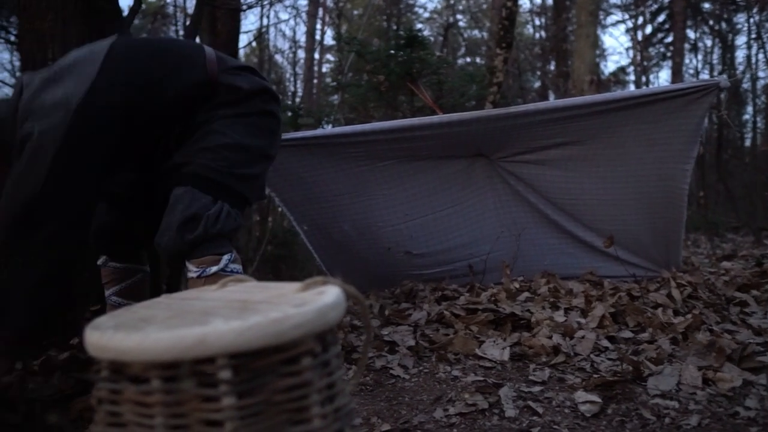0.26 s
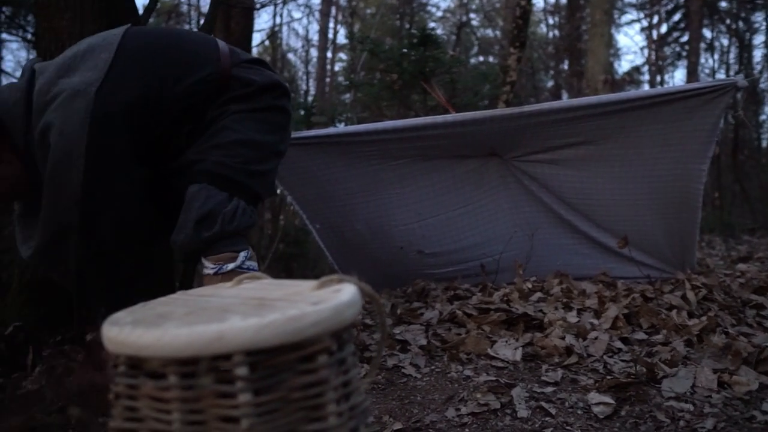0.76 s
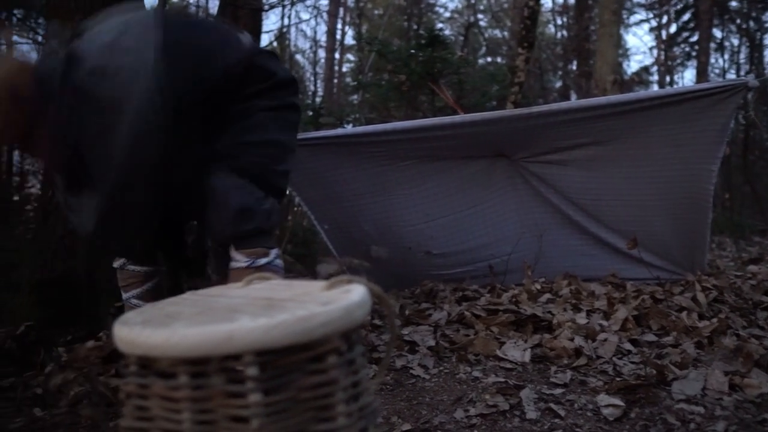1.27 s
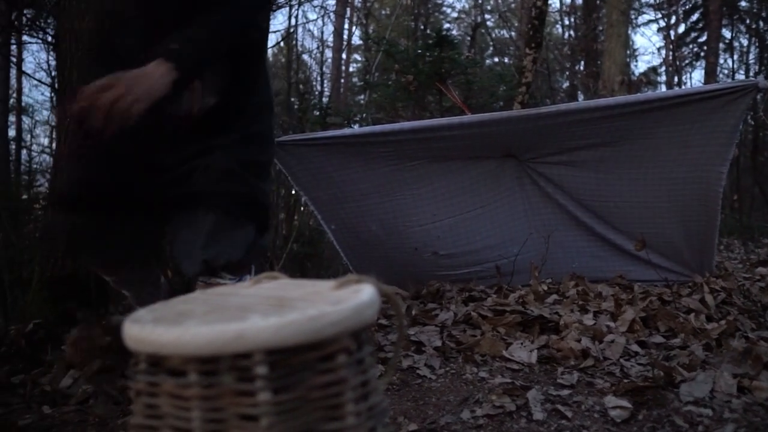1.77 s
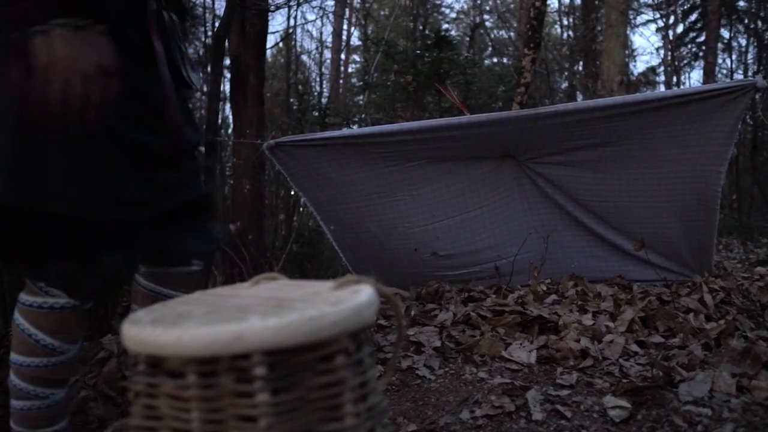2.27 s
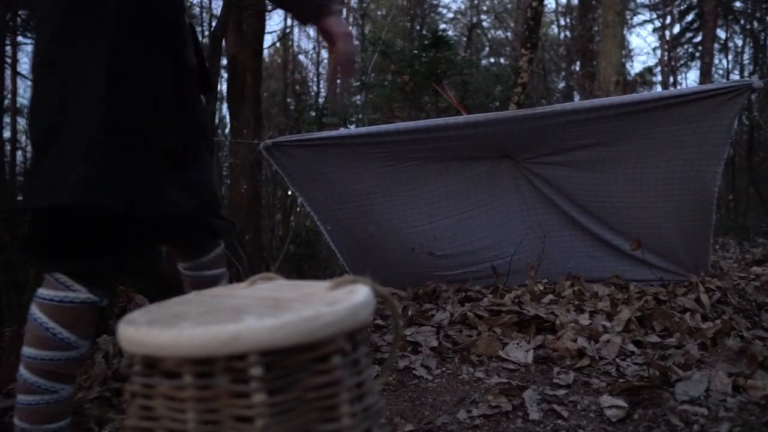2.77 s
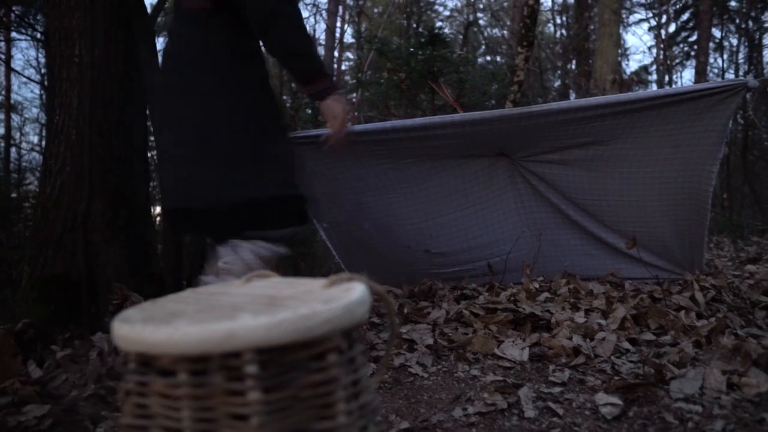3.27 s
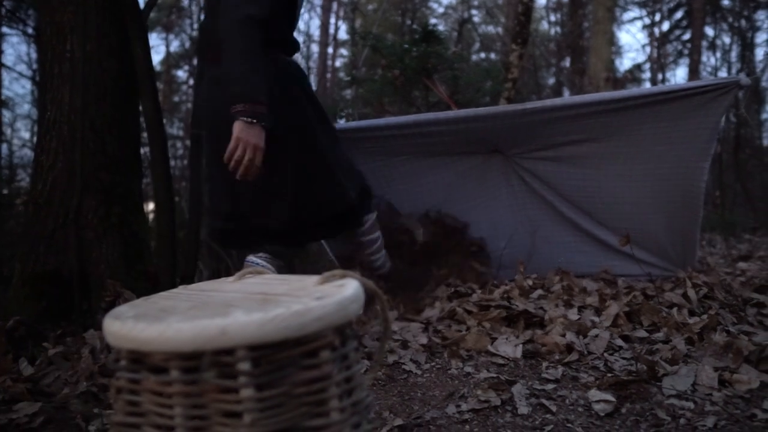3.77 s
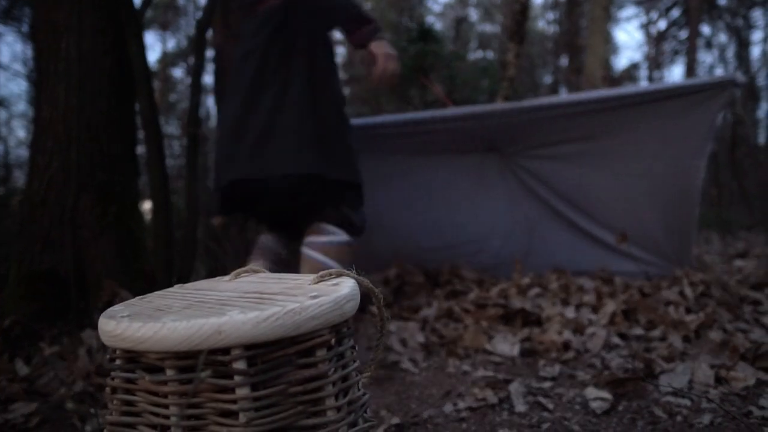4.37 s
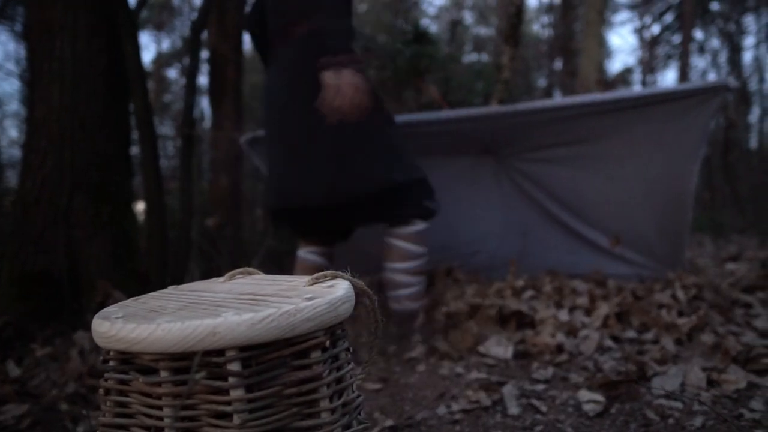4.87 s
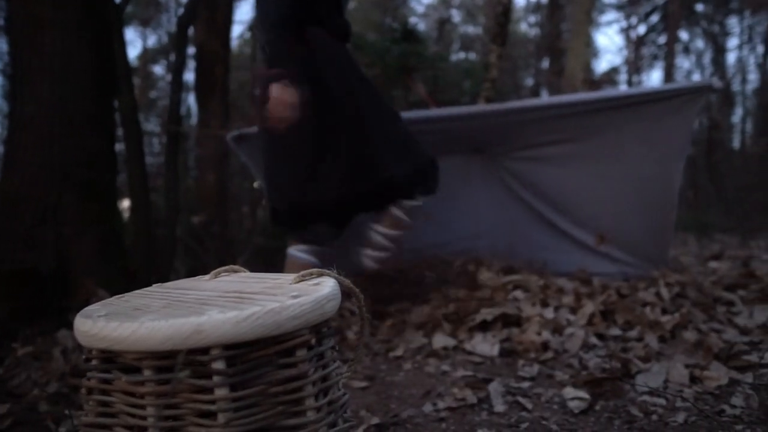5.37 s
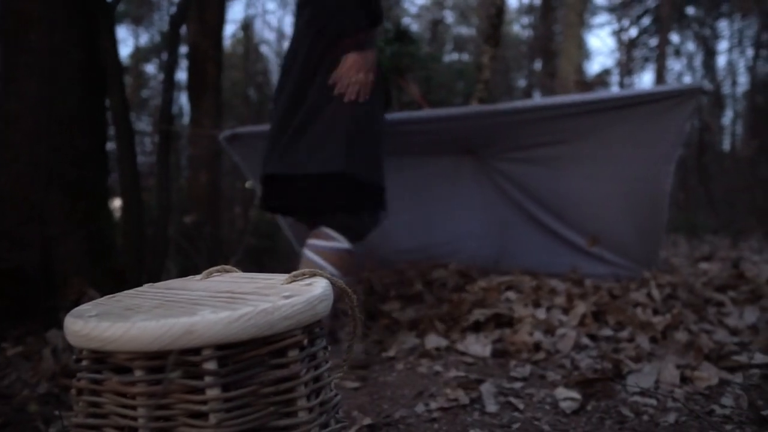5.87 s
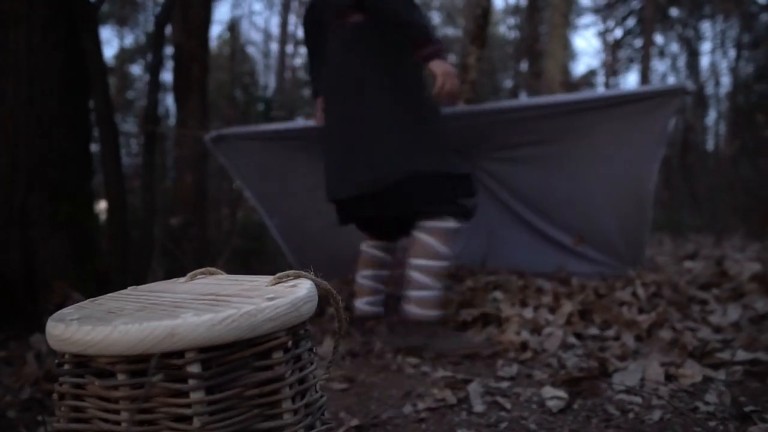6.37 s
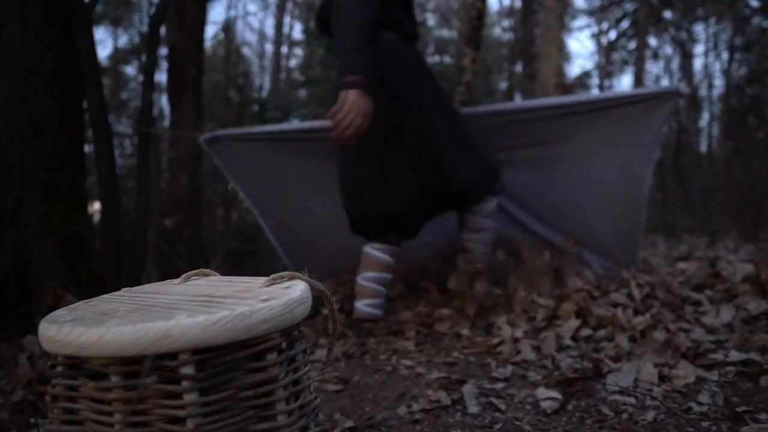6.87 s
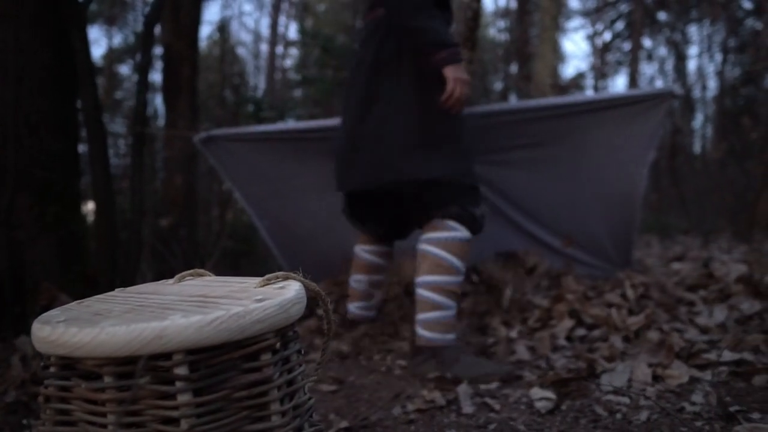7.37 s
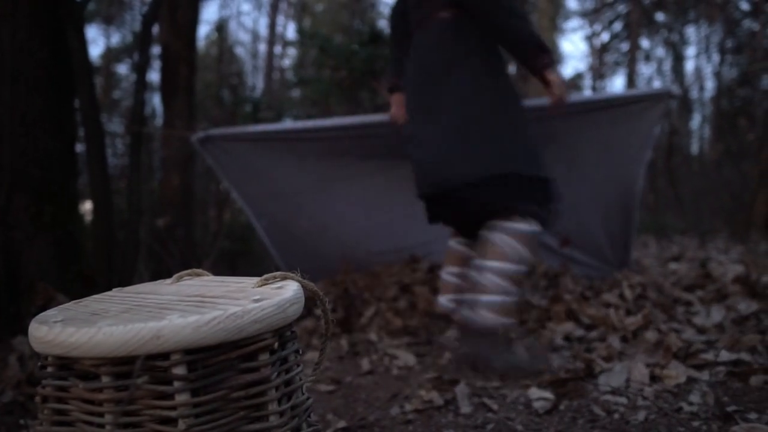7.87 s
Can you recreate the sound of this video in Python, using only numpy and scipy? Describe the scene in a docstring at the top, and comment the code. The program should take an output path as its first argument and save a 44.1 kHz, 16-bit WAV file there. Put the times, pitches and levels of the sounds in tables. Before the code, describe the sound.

Someone rummages by hand in dry fallen leaves, making crisp rustles dotted with snapping stalks and twigs. A few dull bumps follow as the person stands up. Then feet sweep the leaves aside in repeated crunching strokes, with soft thuds on the soil and a few hollow scrapes at the end. The stereo microphone is low and close, in open woodland with a faint rumble of air and no echo.

```python
"""In open woodland, over a faint rumble of moving air, someone crouches and rummages in dry fallen leaves.
Thousands of tiny brittle fractures merge into each rustle, and stalks and twigs snap among them.
The body shifts its weight with dull bumps and stands up; soles thud on the soft soil.
Then the feet sweep the litter aside, ending in a few hollow scrapes of gliding pitch.
All of it reaches the two microphones of a camera that stands low and close."""
import sys
import numpy as np
from scipy import signal
from scipy.fft import rfft, irfft, next_fast_len
from scipy.io import wavfile
from scipy.ndimage import uniform_filter1d, map_coordinates

SR = 44100
rng = np.random.default_rng(int(sys.argv[2]) if len(sys.argv) > 2 else 0)


def master(y):
    """Save y as 16-bit WAV."""
    cut = np.clip(np.atleast_2d(y).T, -1, 1)
    pcm = np.round(cut * 32767)  # scale
    wavfile.write(sys.argv[1], SR, pcm.astype(np.int16))


N = 357651

# A hand or foot pushing through the leaves. Each row: start, swell, hold and release t60 in seconds,
# then in dB the lift of the finest breaks, the relative levels of crackle, crunch and pressed litter,
# and left minus right.
STROKES = [(-0.058, 0.058, 0.00063, 1.6, -1.0, -46.5, -48.5, -66, -2),
           (0.229, 0.02, 0.031, 0.35, 4, -48, -58, -68, 1),
           (0.295, 0.058, 0.14, 0.72, 4.5, -39, -44.5, -60, 1),
           (0.47, 0.092, 0.14, 0.74, 2, -34, -37.0, -51.5, 0.5),
           (0.65, 0.17, 0.02, 1.4, 1.5, -32.5, -33.5, -49, 0),
           (0.987, 0.068, 0.076, 0.83, -3.5, -37, -37.5, -52.5, -1.0),
           (1.364, 0.14, 0.2, 4.4, -2, -44.5, -45.5, -57, -1),
           (1.593, 0.11, 0.079, 0.28, 3.5, -42.5, -44.5, -61.5, 1.5),
           (1.984, 0.007, 0, 0.13, 6, -38.5, -46, -50.5, 1),
           (2.005, 0.027, 0.041, 0.18, 4.5, -35.5, -41, -50.5, -1),
           (2.256, 0.17, 0.078, 0.96, -1.0, -40.5, -40, -53, -1),
           (2.536, 0.31, 0.00037, 0.74, -4.5, -35, -36.0, -51.0, -0.5),
           (2.878, 0.07, 0, 0.71, -3.0, -35.5, -35.5, -45.5, -0.5),
           (3.128, 0.12, 0, 0.13, 8, -49.5, -50.5, -51.0, 1.0),
           (3.347, 0.024, 0.01, 0.2, -1, -35.0, -37, -50.0, -2),
           (3.375, 0.074, 0.02, 0.88, -6, -26.5, -28, -39, -1.0),
           (3.498, 0.075, 0.097, 0.99, -3.5, -29, -32.5, -45, -3.0),
           (3.76, 0.12, 0.22, 2.5, 0.5, -41.0, -43.5, -56, -2.5),
           (4.299, 0.049, 0, 0.13, -1.0, -38.5, -44, -50.5, -1),
           (4.422, 0.1, 0.062, 0.47, -7.5, -34.5, -38, -47.5, -0.5),
           (4.701, 0.19, 0.02, 0.75, 2, -33, -39.5, -44, -2.5),
           (4.901, 0.11, 0.02, 0.98, -1.5, -29, -32.5, -44, -3.5),
           (5.191, 0.1, 0.015, 0.85, 0.5, -38.5, -44.5, -62, -3.5),
           (5.689, 0.011, 0.096, 0.36, -4, -44.5, -48.5, -56.0, -0.5),
           (5.885, 0.07, 0.03, 0.5, -2, -44, -50.5, -60, -1.5),
           (5.979, 0.098, 0.08, 0.37, -0.5, -37.5, -44.0, -56.5, -2.5),
           (6.396, 0.11, 0.038, 0.34, 1, -31.5, -37.5, -47.5, -4),
           (6.497, 0.14, 0.0073, 0.77, -0.5, -27.5, -29.5, -42, -4.5),
           (6.911, 0.17, 0.0046, 0.34, 2, -37.5, -43.0, -58.5, -4.0),
           (7.078, 0.025, 0.17, 0.24, 4, -50, -54, -58.0, -3.5),
           (7.357, 0.061, 0.0015, 0.093, 4.5, -44.5, -49.5, -55, -3.0),
           (7.491, 0.14, 0.0, 0.36, 4, -40, -47.5, -56.5, -2.5),
           (7.605, 0.11, 0.0052, 0.2, 1, -34.5, -40.0, -50, -4.0),
           (7.916, 0.074, 0.02, 0.21, 0.5, -38.5, -41.5, -49.0, -7),
           (7.985, 0.13, 0.05, 0.5, 2.5, -31.5, -33.5, -45.0, -7.0)]
# The person's path from left of the camera to just right of it.
# Each row: time in seconds, lead of the left microphone in seconds, gain of the diffuse part in dB.
PLACE = [(2.2, .00012, 1.8), (3.4, .00001, 1.5), (4.9, -.000005, -1.8), (6.6, -.00002, 0),
         (8.1, -.000025, 1.5)]


def amp(db):
    """Amplitude grows tenfold for every 20 decibels."""
    return np.exp(np.asarray(db) * np.log(10) / 20)


def unit(x):
    """Normalisation to an rms of 1."""
    return x / np.sqrt(np.mean(x ** 2) + 1e-20)


def along(points, hz):
    """Interpolation of (Hz, value) points on a logarithmic frequency axis."""
    knots_hz, values = np.transpose(points)
    return np.interp(np.log(hz + 1), np.log(knots_hz + 1), values)


def curves(rows):
    """Linear interpolation in time: one value a sample for each column after the first."""
    times, *columns = np.transpose(rows)
    return [np.interp(np.arange(N) / SR, times, column) for column in columns]


def wobble(rate):
    """Smooth random modulation: a spline through rate knots a second."""
    knots = rng.standard_normal(int(N * rate / SR) + 4)
    return map_coordinates(knots, [np.arange(N) * rate / SR])


def filtered(x, response):
    """Linear filtering multiplies the spectrum by a frequency response."""
    size = next_fast_len(N + 8192, real=True)
    gain = response(np.fft.rfftfreq(size, 1 / SR)).astype(np.complex64)
    return irfft(rfft(x.astype(np.float32), size) * gain, size)[..., :N]


def below(hz, edge_hz, order=8):
    """A crossover's low-pass share at each frequency."""
    return 1 / (1 + (hz / edge_hz) ** order)


def band(x, hz, spread):
    """A broad, heavily damped resonance from hz / spread to hz * spread."""
    edges = [hz / spread, min(hz * spread, SR / 2 - 500)]
    return signal.sosfilt(signal.butter(2, edges, 'band', fs=SR, output='sos'), x)


def late(x, lag_s):
    """Propagation delay that varies with time."""
    return map_coordinates(x, [np.arange(N) - lag_s * SR], order=4)


def panned(db):
    """Constant-power panning: two gains for a level difference of left minus right."""
    gains = amp(np.array([db, -db]) / 2).reshape(2, -1)
    return gains / np.sqrt(np.mean(gains ** 2, axis=0))


def stereo(pair, colour):
    """Partial coherence: two unrelated signals become left and right, most alike in the bass."""
    # Likeness of the two microphones. Each row: frequency in Hz, coherence from 0 to 1.
    coherence = [(60, .97), (300, .99), (1100, .97), (1800, .93), (2700, .84), (3500, .68), (8000, .62),
                 (15000, .54)]
    mid, side = filtered(pair, lambda hz: colour(hz) * np.sqrt(1 + np.outer([1, -1], along(coherence, hz))))
    return unit(np.array([mid + side, mid - side]))


def add(track, start_s, sound):
    """Superposition: a sound adds to the track from its start time."""
    part = track[:, round(start_s * SR):][:, :sound.shape[-1]]
    part += sound[..., :part.shape[1]]


def effort(settle_db=-9.5, settle_t60_s=1.62):
    """Each stroke's power swells, holds and decays exponentially while the stirred leaves sink back."""
    t = np.arange(0, N / SR, .001)
    start, swell, hold, release = np.array(STROKES).T[:4, :, None]
    rise = np.sin(np.pi / 2 * np.clip((t - start) / swell, 0, 1)) ** 2
    since = np.maximum(t - start - swell - hold, 0)
    settling = amp(settle_db - 60 * since / settle_t60_s) ** 2
    return t, rise * (amp(-60 * since / release) ** 2 + settling)


def stirring():
    """Incoherent strokes add in power, giving each layer of the rustle a level and a pan in dB."""
    t, power = effort()
    bright_db, crackle_db, crunch_db, press_db, pan_db = np.array(STROKES).T[4:]
    treble_pan = 1.8 * pan_db + 5  # the treble is more directional and leans left
    layers = []
    for db, pan in ((crackle_db, treble_pan), (crackle_db + bright_db, treble_pan),
                    (crunch_db, pan_db), (press_db, 0 * pan_db)):
        left, right = (amp(db) * panned(pan)) ** 2 @ power + 1e-12
        level_db, balance_db = 10 * np.log10([(left + right) / 2, left / right])
        layers.append(curves(np.transpose([t, level_db, balance_db])))
    return layers


def fractures(level_db, per_s, scatter_db, rub):
    """Shot noise of tiny breaks over smooth rubbing; harder strokes break more leaves, up to per_s."""
    chance = np.clip(per_s * amp(.6 * (level_db - level_db.max())) / SR, 1e-4, 1)
    breaks = rng.random((2, N)) < chance
    size = amp(scatter_db * np.minimum(rng.standard_normal((2, N)), 2.3))
    rubbing = rng.standard_normal((2, N))
    polarity = np.sign(rubbing[::-1])
    return unit(breaks * size * polarity / np.sqrt(chance)) + rub * rubbing


def litter(pair, low_hz, high_hz):
    """Source and filter: the leaves colour a band of breaks, changing as the person stands and nears."""
    # Spectra of leaves raked by hand, swept by foot and trodden close by.
    # Each row: frequency in Hz, relative spectral level in dB.
    by_hand = [(80, -44), (165, -7), (300, -7.5), (650, -11), (900, -6), (1200, -1), (1650, -7.5),
               (2100, -6.5), (2600, 0), (3350, -3.5), (4900, -5.5), (7000, -10.5), (13000, -10),
               (16000, -14.5)]
    by_foot = [(88, -56), (150, -11), (361, -9), (421, -12), (713, -8.5), (866, -8.5), (1070, -2),
               (1410, -7), (1710, -5.5), (1890, -5.5), (2740, -1.5), (4450, -3), (4910, -1.5), (9520, -2),
               (15800, -4.5)]
    trodden = [(88, -41), (150, -18.5), (244, -8.5), (430, -15.5), (699, -8.5), (955, -9.5), (1650, -6.5),
               (2340, -9), (2790, -1.5), (3660, -4.5), (4200, -4), (7530, -3), (8150, -5.5), (8810, -3),
               (15800, -8)]
    # Resonances of curled leaves and the hollows under them. Each row: centre and width in Hz, gain in dB.
    hollows = [(306, 90, 1), (690, 50, 2.5), (913, 110, -5), (1030, 70, -2.5), (1630, 240, 2.5),
               (2230, 330, 2), (2660, 1700, 2.2), (3860, 460, 0.5)]
    grid = np.geomspace(50, SR / 2, 600)
    hollows_db = sum(db / (1 + (2 * (grid - centre) / width) ** 2) for centre, width, db in hollows)
    share = np.sqrt(np.abs(below(grid, high_hz) - below(grid, low_hz)))
    colours = [amp(along(leaf, grid) + hollows_db) * share for leaf in (by_hand, by_foot, trodden)]
    # Each row: time in seconds, then the weight of each of the three spectra.
    stances = curves([(3.1, 1, 0, 0), (3.3, 0, 1, 0), (5.6, 0, 1, 0), (6.4, 0, 0, 1)])
    _, diffuse_db = curves(PLACE)
    pair = np.array([pair[0], pair[1] * amp(diffuse_db)])
    return sum(weight * stereo(pair, lambda hz: np.interp(hz, grid, colour))
               for weight, colour in zip(stances, colours))


def patchy(x, depth_db):
    """Each handful of leaves has its own resonances, so narrow spectral humps come and go."""
    spectra = signal.stft(x, nperseg=512)[2]
    humps = rng.standard_normal(spectra.shape[1:])
    for _ in range(2):
        humps = uniform_filter1d(humps, size=3, axis=0)  # across frequency
        humps = uniform_filter1d(humps, size=14, axis=1)  # across time
    return signal.istft(spectra * amp(depth_db * unit(humps)), nperseg=512)[1][:, :N]


def propagation(rustle):
    """A reflection comb-filters the rustle, which reaches the nearer microphone first and stronger."""
    # A surface beside the camera reflects less as the person moves.
    # Each row: time in seconds, lag in seconds, strength relative to the direct sound.
    reflection = [(0, 0.0009, 0.2), (5.0, 0.00093, 0.16), (6.6, 0.000874, 0.12)]
    # The camera body favours the nearer side. Each row: frequency in Hz, gain per millisecond of lead.
    near_side = [(150, .1), (450, .7), (1000, 2.4), (1700, 0), (3000, 0)]
    lag_s, strength = curves(reflection)
    combed = np.array([x - strength * late(x, lag_s) for x in rustle])
    lead_s, _ = curves(PLACE)
    midrange = filtered(combed, lambda hz: along(near_side, hz))
    left, right = combed + np.outer([1, -1], 1000 * lead_s) * midrange
    return np.array([late(left, -lead_s / 2), late(right, lead_s / 2)])


def leaves(stir):
    """Brittle fracture in shared clumps: pressed litter rumples, whole leaves crunch, edges crackle."""
    (crackle_db, crackle_pan), (fine_db, _), (crunch_db, crunch_pan), (press_db, _) = stir
    clumps = unit(0.5 * wobble(25) + wobble(60) + 1.3 * wobble(260))
    press = litter(fractures(press_db, per_s=2400, scatter_db=3.5, rub=0.61), 100, 950)
    crunch = litter(fractures(crunch_db, per_s=7000, scatter_db=3, rub=0.51), 950, 4500)
    crackle = litter(fractures(crackle_db, per_s=14000, scatter_db=3, rub=0.63), 4500, 20000)
    finest = filtered(crackle, lambda hz: 1 - below(hz, edge_hz=9800))
    crackle = crackle + finest * (amp(fine_db - crackle_db) - 1)
    rustle = (amp(press_db + 0.3 + 0.75 * clumps) * press
              + amp(crunch_db - 0.19 + 0.54 * clumps) * crunch * panned(crunch_pan)
              + amp(crackle_db + 1.3 + 0.69 * clumps) * crackle * panned(crackle_pan))
    return propagation(patchy(rustle, depth_db=1.5))


def air(hush_db=-53.5):
    """Moving air makes low-frequency noise under the faint broadband hush of the woods."""
    # Strength of the rumble. Each row: time in seconds, level in dB.
    rumble_levels = [(0.0, -62), (2.14, -50), (2.46, -54), (5.58, -58), (6.66, -55.5), (8.11, -60.5)]
    # Spectra of the rumble and the distant hush. Each row: frequency in Hz, relative spectral level in dB.
    rumble_colour = [(12, -39), (20, -13.5), (60, 1), (140, -5.5), (170, -37), (220, -46), (370, -120)]
    hush_colour = [(60, -20), (140, 10.5), (250, 0.5), (600, -4), (2000, -2.5), (15000, -5.5)]
    rumble = stereo(rng.standard_normal((2, N)), lambda hz: amp(along(rumble_colour, hz)))
    hush = stereo(rng.standard_normal((2, N)), lambda hz: amp(along(hush_colour, hz)))
    return amp(curves(rumble_levels)[0]) * rumble + amp(hush_db) * hush


def stalks(crackle_db, pan_db, count, over_db=16, scatter_db=3, centre_hz=9000, octaves=0.53, t60_s=0.011):
    """Small stalks fracture at random moments, their level following the crackle: rows for twigs()."""
    moments = rng.integers(N, size=count)
    size, pitch = np.clip(rng.standard_normal((count, 2)), -2, 2).T
    peak_db = crackle_db[moments] + over_db - scatter_db * size
    pitch_hz = np.minimum(centre_hz * 2 ** (octaves * pitch), SR / 3)
    return [(i / SR, db, hz, t60_s, pan_db[i]) for i, db, hz in zip(moments, peak_db, pitch_hz)]


def twigs(small_snaps):
    """A breaking stalk or twig gives an impulse, then an exponentially damped shiver of leaf."""
    # The loudest breaks. Each row: start in seconds, peak in dB, pitch in Hz, t60 in seconds,
    # left minus right in dB.
    loud_snaps = [(.343, -18, 12500, .008, 4), (0.418, -12, 10500, 0.012, 6), (.433, -19, 10060, .012, 4),
                  (.5526, -12, 11000, 0.0085, 2), (1.6236, -19, 9700, 0.012, .5),
                  (2.0206, -16, 11000, 0.017, 11), (2.041, -17.5, 11000, 0.007, 7),
                  (2.065, -20, 7900, 0.036, 6), (2.1225, -22, 11000, .003, 11),
                  (2.156, -28, 9000, 0.0087, 8), (2.4427, -24.5, 3500, .015, 4),
                  (3.0188, -23.5, 3075, 0.012, -1), (3.0698, -16, 12500, 0.0057, 9),
                  (3.082, -14, 12100, 0.0094, 5.5), (3.2645, -25, 10500, 0.011, 11),
                  (3.344, -26.5, 2610, .02, -1), (3.3744, -19, 4500, .01, 8),
                  (4.2725, -21.5, 8200, 0.038, 4), (4.3157, -10, 11600, 0.0069, 1),
                  (4.3167, -13.5, 6040, 0.0076, 3), (4.893, -17.5, 3500, 0.018, 0),
                  (5.2865, -21, 9000, 0.007, -0.5), (5.687, -39, 3300, 0.053, -5),
                  (6.63, -15, 4500, .015, -3), (6.978, -24, 5960, .015, 5.5),
                  (7.7025, -22, 10200, .027, -4)]
    out, t = np.zeros((2, N)), np.arange(SR // 8) / SR
    impulse = 4 * (t == 0)
    for start, db, hz, t60, pan_db in list(loud_snaps) + small_snaps:
        shiver = rng.standard_normal(len(t)) + 0.52 * rng.standard_normal((2, len(t)))
        crack = band(impulse + shiver * amp(-60 * t / t60), hz, spread=1.45)
        add(out, start, amp(db) * crack / np.abs(crack).max() * panned(pan_db))
    return out


def bumps():
    """Structure-borne sound: a few slow swings of the ground reach the camera through its stand."""
    # The crouching body shifts its weight and rises. Each row: centre in seconds, envelope peak in dB,
    # pitch in Hz, half length in seconds.
    weight_shifts = [(1.06, -44, 76.3, 0.0095), (1.426, -44, 60, 0.015), (1.477, -38, 74.5, 0.014),
                     (1.652, -40, 72, 0.013), (1.883, -47, 50, 0.012), (1.897, -35.5, 67.8, 0.006),
                     (1.978, -46, 62, 0.022), (2.101, -44.5, 55, 0.025), (2.175, -38, 45.6, 0.018),
                     (2.261, -37.5, 50, 0.023)]
    out, t = np.zeros((2, N)), np.arange(-SR // 10, SR // 10) / SR
    for centre, db, hz, half_length in weight_shifts:
        swing = np.cos(2 * np.pi * (hz * t + rng.random()))
        add(out, centre + t[0], amp(db) * np.exp(-(t / half_length) ** 2) * swing)
    return out


def soles():
    """A damped impact: soft shoes press the soil with a dull thud that does not ring."""
    # Soles meeting or scuffing the soil. Each row: start in seconds, rms level at the top in dB,
    # pitch in Hz, rise time in seconds.
    treads = [(1.982, -50, 446, 0.0054), (2.038, -50.5, 302, 0.01), (3.173, -52, 473, 0.0063),
              (3.228, -43, 383, 0.0082), (3.28, -48, 170, 0.0054), (3.42, -49, 300, 0.035),
              (4.989, -55, 620, 0.037), (6.596, -42.5, 225, 0.025), (7.103, -49, 500, .008),
              (7.2, -48.5, 450, 0.0045), (7.409, -46, 318, 0.0038), (7.70, -62, 353, 0.0048)]
    out, t = np.zeros((2, N)), np.arange(SR // 4) / SR
    for start, db, hz, rise in treads:
        push = t / rise * np.exp(1 - t / rise)
        thud = unit(band(rng.standard_normal(len(t)), hz, spread=1.48))
        add(out, start, amp(db) * push * thud)
    return out


def scrapes():
    """Friction of a dragged sole excites one narrow resonance that glides as the foot turns."""
    # Hollow scrapes. Each row: start and end in seconds, rms level at the top in dB,
    # first and last pitch in Hz.
    drags = [(7.16, 7.3, -56, 716, 690), (7.768, 7.817, -54, 722, 640), (7.783, 7.936, -60, 2110, 2220),
             (7.935, 8.03, -53, 772, 660), (8.03, 8.117, -49, 566, 690)]
    out = np.zeros((2, N))
    for start, end, db, from_hz, to_hz in drags:
        progress = np.linspace(0, 1, round((end - start) * SR))
        grit = rng.standard_normal(len(progress)) + 1j * rng.standard_normal(len(progress))
        grit = uniform_filter1d(uniform_filter1d(grit, size=170), size=170)  # narrows the band
        hz = from_hz + (to_hz - from_hz) * progress
        tone = grit * np.exp(2j * np.pi * np.cumsum(hz) / SR)
        add(out, start, amp(db) * np.sin(np.pi * progress) * unit(tone.real))
    return out


def scene():
    """The close sources superpose without reverberation: open woodland gives no audible echo."""
    stir = stirring()
    crackle_db, crackle_pan = stir[0]
    foliage = leaves(stir) + twigs(stalks(crackle_db, crackle_pan, count=14))
    return foliage + soles() + scrapes() + bumps() + air()


def record(dry, top_hz=15950):
    """Channel mismatch and band limit: the two ports differ in gain and phase, and end at top_hz."""
    # Gain mismatch of the microphone ports. Each row: frequency in Hz, left minus right in dB.
    port_db = [(300, 0), (650, -0.2), (1000, 0.4), (2100, 1), (3100, -2.5), (4200, 0), (7500, -2.9),
               (12000, -1.5), (15500, 1.6)]
    # Their phase mismatch. Each row: frequency in Hz, lead of the left in radians.
    port_phase = [(60, .05), (200, .1), (600, .22), (1300, .02), (2200, .08), (3900, .4), (8000, .1),
                  (15000, -.1)]
    half = np.array([[1], [-1]]) / 2  # each side takes half of the difference
    return filtered(dry, lambda hz: amp(half * along(port_db, hz))
                    * np.exp(1j * half * along(port_phase, hz)) * (hz < top_hz))


dry = scene()
out = record(dry)
master(out)
```